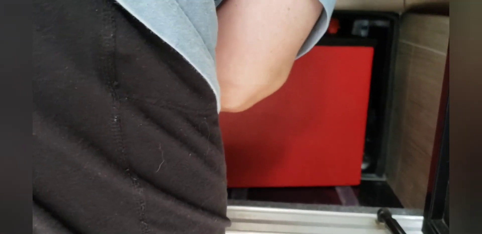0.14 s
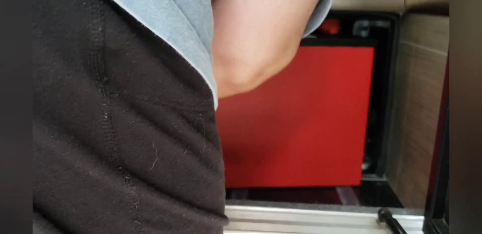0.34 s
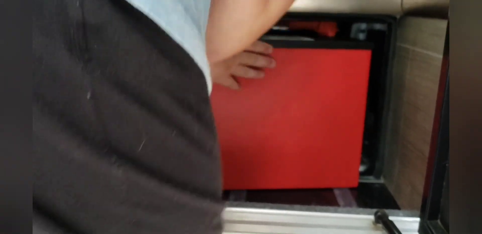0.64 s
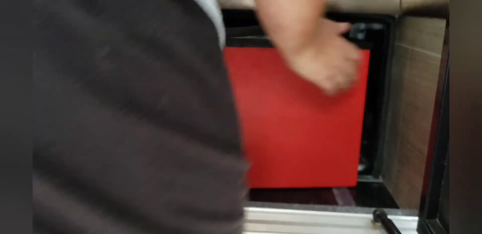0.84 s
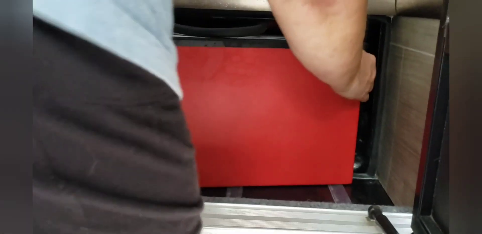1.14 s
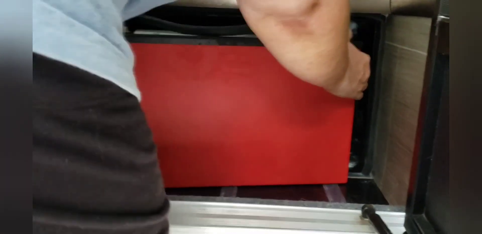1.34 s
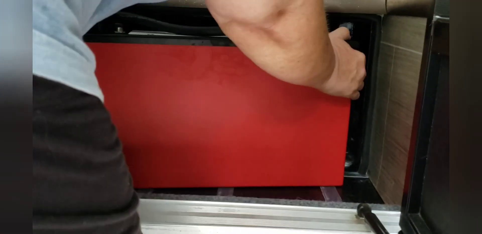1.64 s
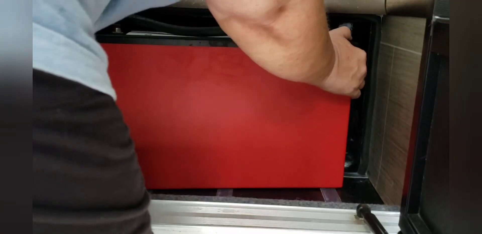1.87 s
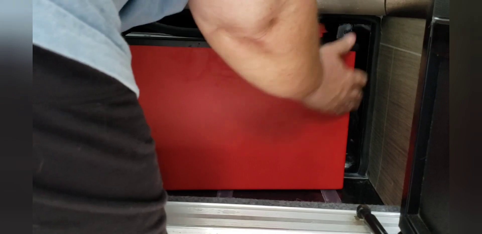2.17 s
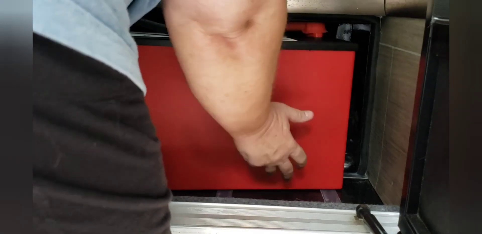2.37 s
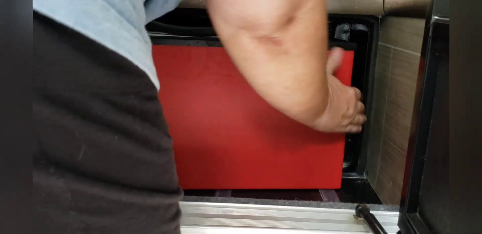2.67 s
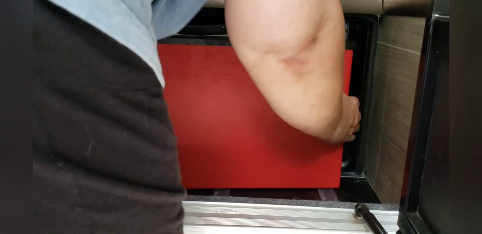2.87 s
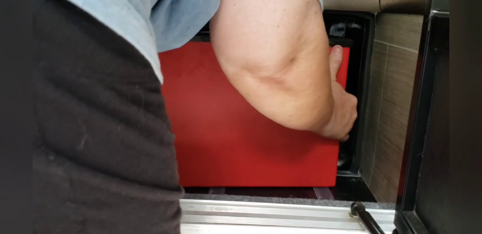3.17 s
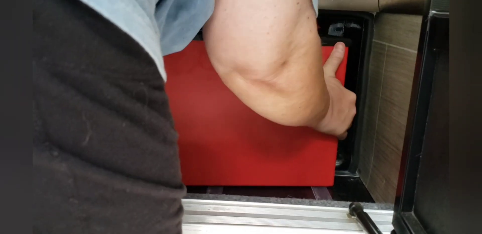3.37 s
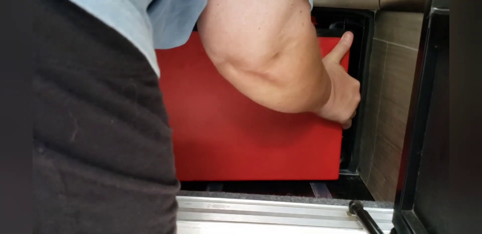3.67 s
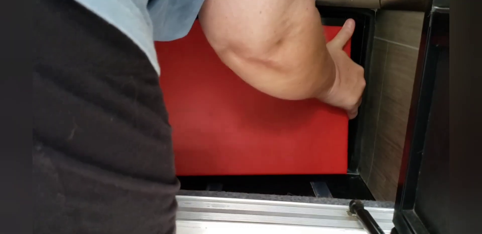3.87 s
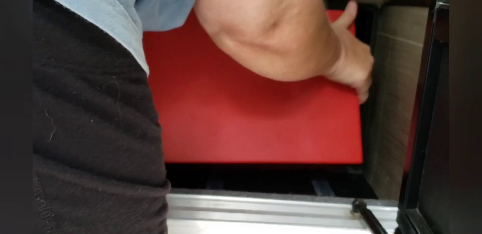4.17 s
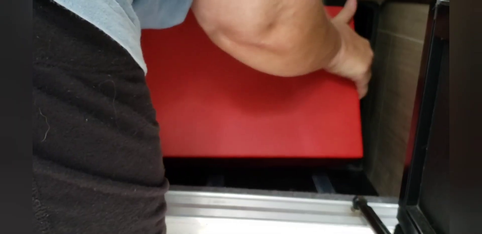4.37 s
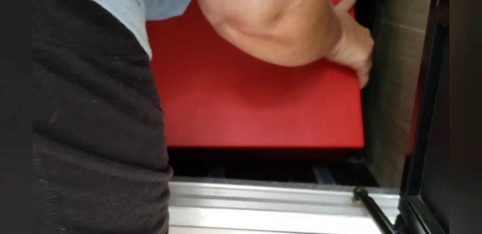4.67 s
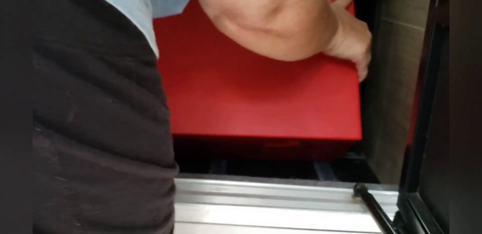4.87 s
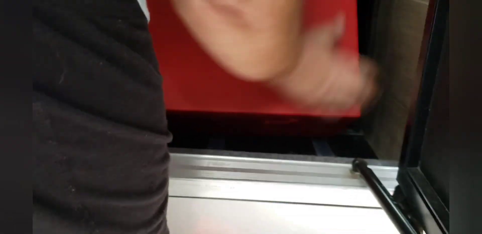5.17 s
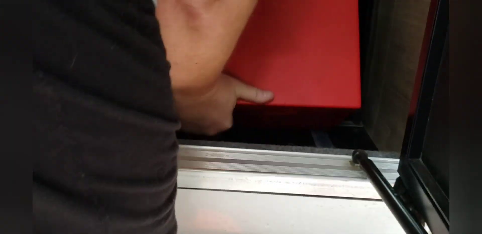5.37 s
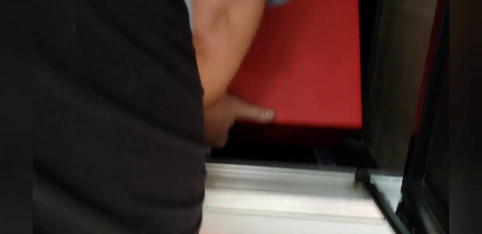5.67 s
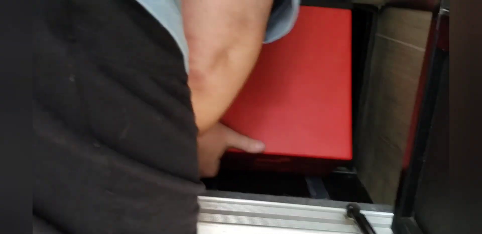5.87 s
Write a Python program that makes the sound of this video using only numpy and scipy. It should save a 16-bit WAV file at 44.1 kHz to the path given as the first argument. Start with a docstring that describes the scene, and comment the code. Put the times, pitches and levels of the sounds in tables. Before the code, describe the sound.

Close up, a weighty box is shoved and dragged in a small metal compartment, with grinding, a rising squeal and sharp snap above idling engine drone.

```python
"""A heavy cased battery is nudged, dragged and tipped in a sheet-metal tray inside a small compartment.
First short shoves grind, scrape and squeak: random ridge catches and near-even slips excite the tray's ring.
Taps, hand slides and lighter shoves follow, then one long haul that ends in a rising, juddering groan.
The tipping edge scrapes and squeals upward, snaps on the rim, and the last shoves set the weight down.
An engine, a sum of shaft orders, idles steadily below throughout, over rumble and hiss of shaped noise."""
import sys
import numpy as np
from scipy import signal
from scipy.fft import rfft, irfft
from scipy.io import wavfile

SR = 44100
rng = np.random.default_rng(int(sys.argv[2]) if len(sys.argv) > 2 else 0)


def master_out(mix):
    """Clip the mix to full scale and print it as 16-bit PCM to the path in sys.argv[1]."""
    frames = np.transpose(np.atleast_2d(mix))
    ceiling = np.clip(frames, -1, 1)
    pcm = np.round(ceiling * 32767).astype(np.int16)
    wavfile.write(sys.argv[1], SR, pcm)


N = 265041
TIME = np.arange(N) / SR
# Colour of the base grinding over the tray floor. Each row: frequency in Hz, relative level in dB per Hz.
DRAG_COLOUR = [(50, -26.5), (110, -7), (180, 1), (300, -2), (600, -10), (1000, -13.5), (2000, -26),
               (4000, -38.5), (15000, -53)]
GRINDING = dict(grains_per_s=2000, spread_db=0.9, judder_db=1.6, judder_rate=57.4)


def from_db(db):
    """Decibels to gain."""
    return 10 ** (np.asarray(db) / 20)


def rms_one(x):
    """Scale to unit power."""
    return x / np.sqrt(np.mean(x ** 2) + 1e-20)


def at_hz(points, hz):
    """Read a spectrum on a log-frequency axis."""
    known, values = np.transpose(points)
    return np.interp(np.log(hz), np.log(known), values)


def drift(rate, count=N):
    """Smooth random wander of spread 1, with `rate` new targets per second."""
    knots = rng.standard_normal(4000)
    place = np.arange(count) / SR * rate % 3999
    return np.interp(place, np.arange(4000), knots) * np.sqrt(1.5)   # makes up for the smoothing


def add(out, s, sound):
    """Mix a stereo sound in at its time in seconds."""
    i = max(round(s * SR), 0)
    out[:, i:i + sound.shape[1]] += sound[:, :max(N - i, 0)]


def through(x, impulse):
    """Pass a signal through an impulse response."""
    return signal.fftconvolve(x, impulse)[:len(x)]


def response(colour, modes=(), tilt_db=0, size=8192):
    """Causal (minimum-phase) impulse response with a given colour, tilt in dB per octave and resonances."""
    hz = np.maximum(np.arange(size // 2 + 1) * SR / size, 1)
    db = at_hz(colour, hz) + tilt_db * np.log2(np.maximum(hz, 60) / 1000)   # pivots at 1 kHz
    for centre, width, lift in modes:
        db = db + lift / (1 + (2 * (hz - centre) / width) ** 2)
    # folding the cepstrum forward puts all the energy after the strike
    cepstrum = irfft(np.log(from_db(db)))
    cepstrum[1:size // 2] *= 2
    cepstrum[size // 2 + 1:] = 0
    return irfft(np.exp(rfft(cepstrum)))


def drags():
    """Short shoves grind the base over the tray floor: force builds, then coasts out."""
    # Each row: start in seconds, length in seconds, level in dB, tilt in dB per octave,
    # ring of that spot in Hz.
    shoves = [(0.222, 0.042, -26.5, -2.5, 243), (0.334, 0.011, -31, -2.5, 212),
              (1.615, 0.14, -34, 0.95, 247), (1.942, 0.067, -34.5, -1.5, 199), (2.13, 0.047, -51, 0, 410),
              (3.06, 0.12, -53, 1, 524), (5.368, 0.017, -34.5, -1, 484), (5.39, 0.054, -43.5, -7, 215),
              (5.77, 0.17, -48.5, -0.5, 214)]
    return strokes(shoves, DRAG_COLOUR, attack_share=0.29, release_s=0.13, **GRINDING)


def haul():
    """One long haul grinds in three registers, each growing with the effort at its own pace."""
    rasp = haul_register(level_db=-39.0, growth=0.72, tilt_db=1.5, spot_hz=670, **GRINDING)
    grit = haul_register(level_db=-42, growth=0.34, tilt_db=4.0, spot_hz=1130, **GRINDING)
    rumble = haul_register(level_db=-35.0, growth=1.43, tilt_db=-0.5, spot_hz=170, **GRINDING)
    return rasp + grit + rumble


def haul_register(level_db, growth, tilt_db, spot_hz, **grain):
    """Grinding at level_db under peak effort; growth is the dB it gains per dB of effort."""
    # Effort of the haul; only its distance below the peak counts.
    # Each row: time in seconds, effort in dB.
    effort = [(3.5, -56), (3.654, -41), (3.73, -38), (3.818, -26), (3.9, -29), (3.94, -32.5), (3.99, -50),
              (4.02, -36), (4.05, -36.5), (4.164, -28.5), (4.3, -71.5)]
    attack_s = 0.089   # the haul eases in
    out, (s, effort_db) = np.zeros((2, N)), np.transpose(effort)
    t = np.arange(s[0], s[-1], 1 / SR)
    push = from_db(level_db + growth * (np.interp(t, s, effort_db) - effort_db.max()))
    push = push * np.minimum((t - s[0]) / attack_s, 1)
    add(out, s[0], friction(push, DRAG_COLOUR, tilt_db, spot_hz, **grain))
    return out


def groan(slips_per_s, jitter, width_hz, grit_db, size=32):
    """The base judders at the end of the haul: slow, gritty slips strike a resonance that glides upward."""
    # The floor's ring rises as the contact nears the rim.
    # Each row: time in seconds, ring in Hz, level in dB.
    glide = [(4.115, 200, -48), (4.141, 268, -34), (4.162, 414, -29.5), (4.182, 685, -37), (4.21, 810, -39),
             (4.24, 830, -55)]
    out, (s, ring_hz, db) = np.zeros((2, N)), np.transpose(glide)
    t = np.arange(s[0], s[-1], 1 / SR)
    slip_hz = slips_per_s * (1 + jitter * drift(slips_per_s, count=len(t)))
    turns = np.cumsum(slip_hz) / SR
    slips = np.diff(np.floor(turns), prepend=0)   # one pulse per slip
    force = rms_one(slips) + from_db(grit_db) * rng.standard_normal(len(t))
    r = np.exp(-np.pi * width_hz / SR)
    angle = 2 * np.pi * np.interp(t, s, ring_hz) / SR
    state, blocks = np.zeros(2), []
    for i in range(0, len(t), size):   # retune the resonance every `size` samples
        poles = [1, -2 * r * np.cos(angle[i]), r * r]
        block, state = signal.lfilter([1, 0, -1], poles, force[i:i + size], zi=state)
        blocks.append(block)
    ring = from_db(np.interp(t, s, db)) * rms_one(np.concatenate(blocks))
    add(out, s[0], compartment(np.pad(ring, (0, SR // 4))))
    return out


def scrapes():
    """Edges scrape along the metal with a dense, quickly juddering grain."""
    # Each row: start in seconds, length in seconds, level in dB, tilt in dB per octave,
    # ring of that spot in Hz.
    edge_strokes = [(0.196, 0.052, -25, -1.3, 1900), (1.736, 0.018, -23.5, -1, 1730),
                    (1.978, 0.015, -28.5, -0.5, 1550), (2.583, 0.006, -37, -1.5, 740),
                    (2.592, 0.03, -45, -0.8, 3600), (3.9, 0.028, -49.5, 0.5, 4200),
                    (4.075, 0.05, -38, -2.5, 850), (4.115, 0.11, -35, -1.8, 2000),
                    (4.296, 0.036, -42.5, -1, 1500), (4.344, 0.097, -38, -0.8, 1750),
                    (4.421, 0.055, -36, -1.1, 2100), (4.476, 0.063, -37, -1.5, 1700),
                    (4.724, 0.13, -36, -0.4, 1700), (4.85, 0.076, -38.5, 0.8, 5600),
                    (5.082, 0.013, -31.5, 0.1, 2400), (5.37, 0.045, -45, 3, 1500),
                    (5.865, 0.067, -45, -1, 1090)]
    # Colour of the scrape. Each row: frequency in Hz, relative level in dB per Hz.
    edge_colour = [(80, -10), (250, -5), (600, -7.5), (1000, -4.5), (1700, -6), (2600, -9.5), (3800, -4),
                   (5000, -9), (7000, -9), (9000, -13), (12500, -9.5), (15500, -12)]
    # the push is arch_db harder in mid-stroke than at the ends
    return strokes(edge_strokes, edge_colour, attack_share=0.092, release_s=0.038, arch_db=1.5,
                   grains_per_s=5000, spread_db=1.4, judder_db=2, judder_rate=220)


def strokes(rows, colour, attack_share, release_s, arch_db=0, **grain):
    """Every stroke builds up, bears down and coasts to a stop; long ones start and stop more gently."""
    coast_share = 0.43   # share of the stroke's length added to its 60 dB release time
    out = np.zeros((2, N))
    for start, length, level_db, tilt_db, spot_hz in rows:
        t = TIME[:3 * SR // 4]
        attack = np.minimum(t / (attack_share * length), 1)
        arch = arch_db * (np.sin(np.pi * np.minimum(t / length, 1)) - 2 / np.pi)
        release = from_db(-60 * np.maximum(t - length, 0) / (release_s + coast_share * length))
        push = from_db(level_db + arch) * attack * release
        add(out, start, friction(push, colour, tilt_db, spot_hz, **grain))
    return out


def friction(push, colour, tilt_db, spot_hz, grains_per_s, spread_db, judder_db, judder_rate,
             shift=0.5, shift_rate=22):
    """Tiny ridges catch at random under juddering pressure; weight shifts between two unlike corners."""
    corner_detune = 0.044   # the corners ring this share below and above the spot
    count, out = len(push), 0
    judder = from_db(judder_db * drift(judder_rate, count=count))
    lean = np.pi / 4 + shift * drift(shift_rate, count=count)
    for load, detune in ((np.cos(lean), -corner_detune), (np.sin(lean), corner_detune)):
        ring = tray(colour, tilt_db, spot_hz * (1 + detune))
        caught = rng.random(count) < grains_per_s / SR
        strength = from_db(spread_db * np.minimum(rng.exponential(1, count), 4))
        grains = caught * rng.standard_normal(count) * strength
        force = rms_one(grains * judder) * load * push
        out = out + compartment(through(np.pad(force, (0, SR // 8)), ring))
    return out


def squeal(**roughness):
    """As the battery tips, the pitch rises with the speed of the edge and turns ragged where it jumps."""
    # Each row: time in seconds, slips per second, level in dB before the mix trim,
    # unevenness as a share of the rate.
    course = [(4.735, 420, -41, .03), (4.772, 490, -33.5, .015), (4.79, 545, -29.5, .01),
              (4.818, 670, -27, .01), (4.84, 890, -30, .012), (4.849, 1330, -31, .03),
              (4.866, 1325, -31, .02), (4.875, 1255, -28.5, .008), (4.888, 1265, -28, .01),
              (4.894, 1420, -27.5, .03), (4.906, 1510, -26.5, .022), (4.923, 1480, -29, .025),
              (4.93, 1440, -50, .04)]
    # How strongly the squealing edge radiates. Each row: frequency in Hz, relative level in dB.
    edge_colour = [(400, -1), (520, 4), (680, 5), (900, 2), (1100, -3), (1250, -4), (1340, 2), (1500, 5),
                   (2000, 0), (2350, 0), (2510, 6), (2700, -1), (3050, -5), (3800, 1), (4400, -1),
                   (5000, -4), (6300, -5), (9000, -14), (15000, -24)]
    out, (s, *columns) = np.zeros((2, N)), np.transpose(course)
    t = np.arange(s[0], s[-1], 1 / SR)
    slips, db, jitter = (np.interp(t, s, column) for column in columns)
    add(out, s[0], stick_slip(slips, from_db(db), edge_colour, 0, jitter, **roughness))
    return out


def squeaks(**roughness):
    """Brief stick and slip, low under full weight, high at a free corner, swells and fades on one pitch."""
    # Each row: start in seconds, length in seconds, slips per second, level in dB before the mix trim,
    # overtone slope in dB per octave.
    groans = [(0.166, 0.066, 262, -27, -17), (0.239, 0.045, 104, -20, -18), (1.524, 0.012, 1370, -41, -9),
              (1.543, 0.012, 1720, -46, -10), (1.611, 0.092, 220, -30, -14), (3.765, 0.09, 168, -33, -20),
              (3.873, 0.031, 630, -35, -14), (3.895, 0.073, 137, -32, -18.5), (4.098, 0.06, 80, -32.5, -14),
              (4.16, 0.076, 138, -29.5, -18), (4.424, 0.03, 530, -38, -14)]
    # How strongly the slips radiate. Each row: frequency in Hz, relative level in dB.
    slip_colour = [(150, -4.5), (260, -2.5), (520, 6), (900, 8), (1400, -6), (2500, -7), (3200, -19),
                   (4200, -18), (6000, -27), (15000, -41)]
    out = np.zeros((2, N))
    for start, length, slips, level_db, slope_db in groans:
        swell = np.sin(np.linspace(0, np.pi, round(length * SR)))
        add(out, start, stick_slip(slips, from_db(level_db) * swell, slip_colour, slope_db, **roughness))
    return out


def stick_slip(slips, push, colour, slope_db, jitter, jitter_rate, flutter_db, **walls):
    """Slips come almost evenly and make a rough tone with fluttering overtones."""
    hz = slips * (1 + jitter * drift(jitter_rate, count=len(push)))
    phase = 2 * np.pi * np.cumsum(hz) / SR
    partials = np.arange(1, 10)[:, None]
    flutter = flutter_db * np.array([drift(160.0, count=len(push)) for k in partials])
    gains = from_db(at_hz(colour, partials * hz) + slope_db * np.log2(partials) + flutter)
    tone = (gains * np.sin(partials * phase)).sum(0) / np.linalg.norm(gains, axis=0)
    return compartment(np.pad(push * tone, (0, SR // 4)), **walls)


def thuds():
    """The weight comes down with a low blow and rocks to rest."""
    # Each row: time in seconds, level in dB, tilt in dB per octave, ring of that spot in Hz.
    landings = [(0.243, -22, -3, 104), (0.975, -42, 2.5, 202), (1.43, -38.5, 0.5, 79),
                (2.61, -37.5, 2, 73.5), (4.925, -32.5, 2, 111), (5.397, -32.5, -2.5, 167),
                (5.79, -36.5, 0.5, 89.5)]
    # Colour of the landing. Each row: frequency in Hz, relative level in dB per Hz.
    weight_colour = [(20, -46), (35, -23), (60, -3), (100, -3), (170, -2.5), (400, -22.5), (800, -27),
                     (2000, -40), (15000, -58)]
    return blows(rocking(landings), weight_colour, chatter_db=4.0, chatter_s=0.013)


def rocking(landings, count=4):
    """Each landing is followed by a few ever weaker rocks."""
    spacing_s = 0.033
    first_db, loss_db = -9.5, 1   # first rock against the landing, loss per further rock
    rocks = []
    for s, db, tilt_db, spot_hz in landings:
        for k in range(count):
            rock_s = s + spacing_s * (k + rng.uniform(0.79, 1.1))
            rocks.append((rock_s, db + first_db - loss_db * k, tilt_db, spot_hz))
    return list(landings) + rocks


def clicks():
    """Edges snap on the rim: hard, brief contacts that wake only part of the tray's ring."""
    # Each row: time in seconds, level in dB before the mix trim, tilt in dB per octave,
    # ring of that spot in Hz.
    snaps = [(1.749, -29, -8, 1060), (1.984, -41.5, -3, 1550), (5.0968, -25, -1, 5500),
             (5.0995, -23.5, -2, 2370), (5.1008, -17.5, -0.6, 2470), (5.1105, -35, 0, 3600)]
    # Colour of the snap. Each row: frequency in Hz, relative level in dB per Hz.
    rim_colour = [(100, -24), (600, -17), (1400, 1.5), (2400, 4.5), (3300, 7.5), (4600, 3.5), (6000, 6),
                  (7200, 5.5), (8500, -4), (15500, -7.5)]
    return blows(snaps, rim_colour, chatter_db=10, chatter_s=.0014, ring_share=0.57,
                 lag_s=.00028, near_db=-8, near_s=.004, tail_db=-14, tail_hz=11000)


def taps():
    """Fingers and nails tap the case: brief blows that wake only part of the ring."""
    # Each row: time in seconds, level in dB, tilt in dB per octave, ring of that spot in Hz.
    touches = [(0.793, -46.5, 5, 6000), (0.850, -39.5, -0.5, 1330), (0.976, -58, 1, 1400),
               (1.382, -52.5, 8, 12000), (1.429, -51.5, -2.5, 2980), (1.527, -44, -4.5, 1400),
               (2.52, -55, 6, 12000), (2.537, -51, 11, 12000), (2.583, -40, 3, 3300),
               (2.714, -52.5, 4, 5900), (5.312, -47.5, 9.5, 7000), (5.628, -51, 9, 12000),
               (5.641, -46.5, 9, 12000), (5.686, -53, 2.5, 2700), (5.702, -52.5, 5, 6800),
               (5.732, -52.5, 5, 6600)]
    # Colour of the tap. Each row: frequency in Hz, relative level in dB per Hz.
    nail_colour = [(200, -8), (700, -5), (1400, 4.5), (2400, -7.5), (4500, -4), (6500, -8), (9000, -17),
                   (12500, -10), (15500, -16.5)]
    return blows(touches, nail_colour, chatter_db=1, chatter_s=.003, ring_share=0.57,
                 near_db=-5, near_s=.005, tail_db=-11)


def blows(hits, colour, chatter_db, chatter_s, ring_share=1, **walls):
    """One impulse per blow, then a brief chatter of the touching faces, ringing the tray."""
    out, t = np.zeros((2, N)), TIME[:SR // 4]
    for s, level_db, tilt_db, spot_hz in hits:
        force = rng.standard_normal(len(t)) * np.exp(-t / chatter_s)
        force *= from_db(chatter_db) / np.linalg.norm(force)
        force[0] += 1
        ring = through(force, tray(colour, tilt_db, spot_hz, ring_share))
        blow = compartment(ring / np.linalg.norm(ring), **walls)
        add(out, s, from_db(level_db) * np.sqrt(SR / 100) * blow)   # dry level as power over 10 ms
    return out


def hands(**grain):
    """Hands slide over the case: soft friction that swells and fades."""
    # Each row: start in seconds, length in seconds, level in dB, tilt in dB per octave,
    # ring of that spot in Hz.
    rubs = [(1.199, 0.66, -56, -1.5, 4300), (2.52, 0.19, -51, 6, 12500), (3.55, 0.96, -57.5, -1, 3600),
            (4.6, 0.53, -47, 0, 3200), (5.478, 0.16, -42, 5.5, 13800), (5.761, 0.25, -50, 4, 6600)]
    # Colour of skin on the case. Each row: frequency in Hz, relative level in dB per Hz.
    skin_colour = [(200, 5), (1000, -26), (3000, -7.5), (6500, -12.5), (9000, -12), (15500, -8)]
    out = np.zeros((2, N))
    for start, length, level_db, tilt_db, spot_hz in rubs:
        swell = np.sin(np.linspace(0, np.pi, round(length * SR)))
        add(out, start, friction(from_db(level_db) * swell, skin_colour, tilt_db, spot_hz, **grain))
    return out


def tray(colour, tilt_db, spot_hz, ring_share=1):
    """How the loaded tray answers a contact at one spot, as a unit-energy impulse response."""
    # Resonances of the loaded tray. Each row: frequency in Hz, width in Hz,
    # lift in dB at full ring share.
    resonances = [(92, 80, 2.5), (222.9, 7, 5.5), (258.5, 29, 6.5), (388.3, 17, 6.5), (524.7, 49, 9),
                  (697, 146, 7.5), (1040, 24, 4), (1200, 210, -4), (1494, 70, 4.5), (1690, 49, 5),
                  (1817, 26, 3), (2004, 25, 4.5), (2220, 42, 7), (2510, 84, 6), (2800, 44, 6.5),
                  (3130, 96, 5.5), (3360, 45, 3), (4700, 55, 4), (6010, 33, 7), (7090, 84, 3.5)]
    spot_lift_db, spot_width = 7, 0.16   # lift at full ring share; width as a share of the spot's pitch
    spot = (spot_hz, spot_width * spot_hz, spot_lift_db)
    modes = [(hz, width, ring_share * lift) for hz, width, lift in list(resonances) + [spot]]
    ring = response(colour, modes, tilt_db)
    return ring / np.linalg.norm(ring)


def compartment(x, lag_s=.00013, near_db=-9, near_s=0.014, near_hz=700,
                tail_db=-9, tail_t60=0.15, tail_hz=7000):
    """Sound reaches the right first; close walls scatter each contact anew, then a short dull tail."""
    t, sides = TIME[:SR // 4], []
    for delay in (lag_s * rng.uniform(0.7, 1.25), 0):   # left, right; each contact lies at its own angle
        near = rng.standard_normal(len(t)) * np.exp(-t / near_s)
        near = signal.lfilter(*signal.butter(2, near_hz, "high", fs=SR), near)
        tail = rng.standard_normal(len(t)) * from_db(-60 * t / tail_t60) * (1 - np.exp(-t / .004))
        tail = signal.lfilter(*signal.butter(1, tail_hz, fs=SR), tail / np.linalg.norm(tail))
        echoes = from_db(near_db) * near / np.linalg.norm(near) + from_db(tail_db) * tail
        echoes[round(delay * SR)] += 1   # the direct path
        sides.append(through(x, echoes))
    return np.array(sides)


def engine(waver, unevenness):
    """Two firings a turn carry the idling hum; higher shaft orders swell and sink more unevenly."""
    # Each row: multiple of the shaft rate, level in dB relative to the engine's gain.
    orders = [(1, -47), (2, 0.5), (3, -6.5), (4, -8), (5, -14), (6, -22.5), (7, -27.5), (8, -39.5),
              (9, -35), (10, -23.5)]
    shaft_hz, gain_db = 29.87, -44
    turns = np.cumsum(shaft_hz * (1 + waver * drift(4))) / SR
    out = np.zeros(N)
    for order, db in orders:
        swell = 1 + unevenness * np.sqrt(order) * drift(6.5)
        out += from_db(db) * swell * np.sin(2 * np.pi * (order * turns + rng.random()))
    return from_db(gain_db) * out


def air(apart_hz, waver_db):
    """Slightly wavering noise: rumble common to both sides and hiss that differs between them."""
    # Colour of the background air. Each row: frequency in Hz, relative level in dB per Hz.
    air_colour = [(18, -36), (30, -15), (42, -10), (64, 0.5), (81, -6.5), (127, -4), (194, -14.5),
                  (364, -15), (426, -19.5), (512, -17), (988, -26), (2060, -27.5), (2350, -29.5),
                  (4700, -37.5), (6400, -34.5), (9000, -44.5), (12000, -33), (16000, -38)]
    level_db = -51
    mid, side = rng.standard_normal((2, N))
    side = signal.sosfilt(signal.butter(1, apart_hz, "high", fs=SR, output="sos"), side)
    colour = response(air_colour)
    floor = rms_one(np.array([through(mid + side, colour), through(mid - side, colour)]))
    return from_db(level_db + waver_db * drift(11.0)) * floor


def scene():
    """Battery, hands and tray in the compartment, over the engine and the air."""
    grinding = drags() + haul() + groan(slips_per_s=90, jitter=.08, width_hz=90, grit_db=-6)
    slipping = squeaks(jitter=.035, jitter_rate=450, flutter_db=3.5)
    slipping = slipping + squeal(jitter_rate=900, flutter_db=3, near_db=-13, tail_db=-17)
    rubs = hands(grains_per_s=1800, spread_db=2, judder_db=2.2, judder_rate=45)
    handling = grinding + scrapes() + rubs + thuds() + taps()
    handling = handling + from_db(-2.5) * clicks() + from_db(-0.95) * slipping   # mix trims
    return handling + engine(waver=0.0045, unevenness=0.11) + air(apart_hz=800, waver_db=.6)


def record(dry):
    """The right side is louder than the left, loud peaks are rounded and the top is cut."""
    # Left over right, split evenly between the sides. Each row: frequency in Hz, difference in dB.
    lean = [(110, -3.2), (300, -3.3), (700, -5.5), (1290, -6.3), (2380, -2.2), (4400, -2.8), (8120, -3.0),
            (15000, -6.3)]
    ceiling, cutoff_hz = 0.8, 15850   # limit of the rounding (full scale = 1), top of the band
    sides = []
    for x, sign in zip(dry, (1, -1)):
        balance = [(hz, sign * db / 2) for hz, db in lean]
        sides.append(through(x, response(balance)))
    rounded = ceiling * np.tanh(np.array(sides) / ceiling)
    return signal.sosfilt(signal.ellip(10, .1, 80, cutoff_hz, fs=SR, output="sos"), rounded)


dry = scene()
out = record(dry)
master_out(out)
```